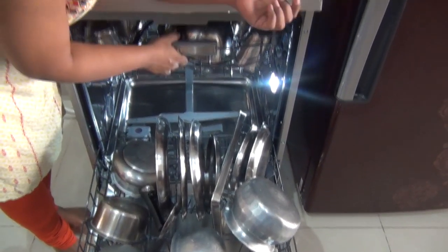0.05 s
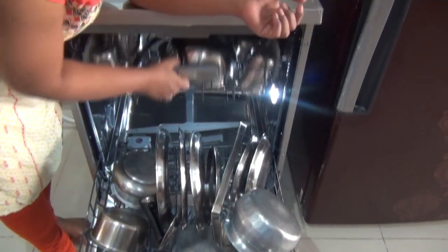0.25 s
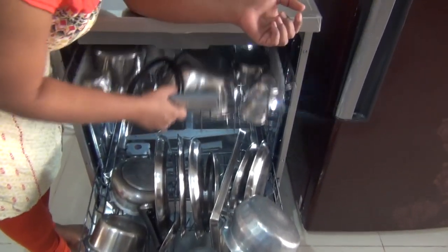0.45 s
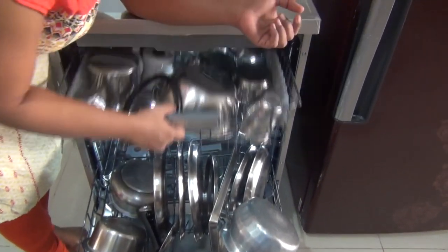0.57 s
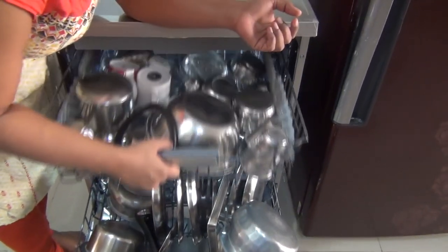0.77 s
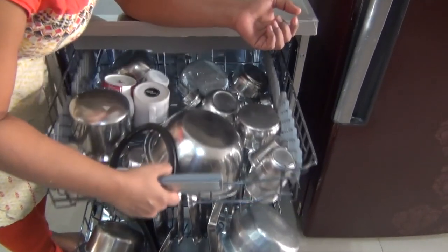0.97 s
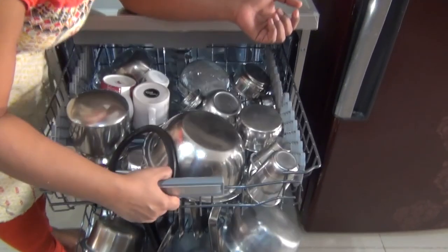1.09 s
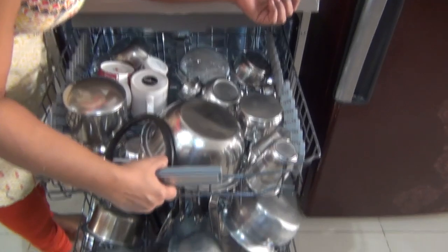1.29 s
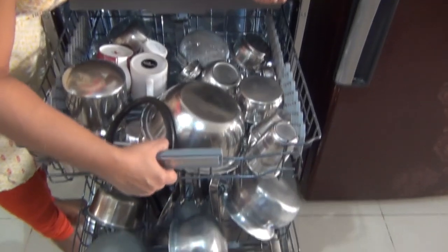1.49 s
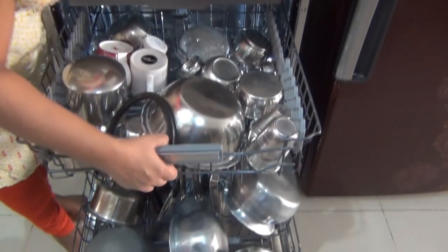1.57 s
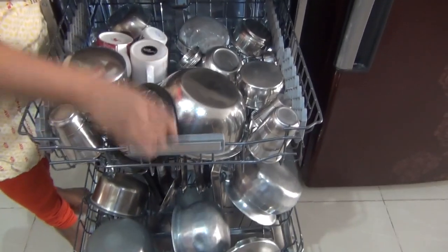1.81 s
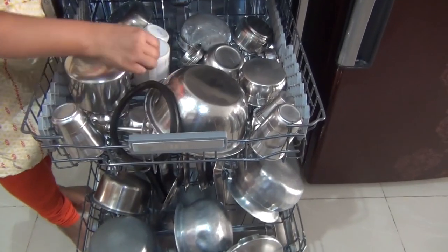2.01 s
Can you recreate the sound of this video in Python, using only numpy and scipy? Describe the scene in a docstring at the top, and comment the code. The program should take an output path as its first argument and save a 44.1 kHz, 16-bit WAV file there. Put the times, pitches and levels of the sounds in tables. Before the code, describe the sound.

A dishwasher rack full of steel pots and cups rolls out with a growing rumble and rattle. The pots clank together, the rack bangs against its stop, and rubbing steel squeaks briefly, heard close by in a quiet kitchen.

```python
"""A dishwasher's upper rack, loaded with steel pots and cups, is pulled out in a quiet kitchen.
Its rolling wheels rumble and the load chatters as it gains speed. The pots crash together, then the
rack hits its end stop; both impacts excite the natural modes of the steel, and the frame shudders.
While the load settles, steel rubs on the rack and friction makes it sing briefly on one note."""
import sys
import numpy as np
from scipy import signal
from scipy.fft import rfft, irfft, next_fast_len
from scipy.io import wavfile
from scipy.ndimage import uniform_filter1d

SR = 44100
rng = np.random.default_rng(int(sys.argv[2]) if len(sys.argv) > 2 else 0)


def store_pcm(level_fs):
    """Save levels as 16-bit WAV."""
    pcm = np.round(np.clip(level_fs, -1, 1) * 32767).astype(np.int16)
    wavfile.write(sys.argv[1], SR, np.atleast_2d(pcm).T)


N = 90404
BURST_SAMPLES = 26460

# Levels along the pull: time_s, rumble_db, chatter_db
PULL_LEVELS = [(0, -77, -64), (.1, -54, -53), (.2, -53.5, -49.5), (.29, -43, -46), (.45, -44, -42),
               (0.521, -34.5, -37.5), (.62, -40, -35), (.71, -36.5, -36.5), (.87, -38, -37.5),
               (0.956, -40, -42.5), (1.04, -44.5, -45.5), (1.12, -46, -48.5), (1.21, -49, -49),
               (1.29, -55, -50.5), (1.42, -66, -63), (1.6, -69, -64), (2.05, -84, -81)]
# Spectra of the wheels and of the ticking load: frequency_hz, relative_db
RUMBLE_SPECTRUM = [(20, -30), (55, -18), (85, -20), (140, -0.5), (200, -4.5), (290, 2), (400, -4),
                   (480, -1.5), (750, -1), (1100, -12), (2500, -35.5), (14000, -63)]
CHATTER_SPECTRUM = [(100, -22), (500, -14.5), (900, -1), (1600, 0), (2200, -3), (4200, -9), (6500, -10.5),
                    (8000, -11), (10000, -8.5), (10900, -13), (12300, -10), (14000, -53)]


def rolling_rack(utensils=5, taps_per_s=420, t60_s=0.027):
    """Forced vibration: wheels rumble in their tracks and shaken utensils tap the wires at random."""
    times, rumble_db, chatter_db = np.transpose(PULL_LEVELS)
    t, ticks, all_taps = since(0), np.zeros((2, N)), np.zeros(N)
    for _ in range(utensils):
        taps = (rng.random(N) < taps_per_s / utensils / SR) * rng.choice([-1, 1], N)
        accent_db = 2 * np.minimum(rng.exponential(1, N), 2.5)
        taps = taps * amp(accent_db)
        direct = unit_rms(stereo_noise() * decay(t[:BURST_SAMPLES], t60_s))
        tick = direct + amp(-6) * unit_rms(room_tail())
        ticks += convolve(taps, colour(tick, CHATTER_SPECTRUM, ripple_db=3.5))
        all_taps += taps
    ring = convolve(all_taps, ringing(PAN_MODES + CUP_MODES))
    chatter = unit_rms(ticks) + amp(-6) * unit_rms(ring)
    rumble = colour(stereo_noise(N), RUMBLE_SPECTRUM)
    return chatter * amp(np.interp(t, times, chatter_db)) + rumble * amp(np.interp(t, times, rumble_db))


# Contacts between the pots: start_s, level_db, hold_s
POT_CONTACTS = [(0.7356, -22.5, 0.0023), (0.7403, -23, 0.0072), (.751, -26.5, 0.0039)]
# Spectrum of each contact: frequency_hz, relative_db
CRASH_SPECTRUM = [(30, -22), (70, -16), (150, -7), (300, -6), (680, -7), (1050, -9), (1470, 3), (1920, -7),
                  (2300, -5), (4100, -8), (7700, -10), (8700, -19), (9900, -11.5), (11600, -15),
                  (12500, -32), (13300, -61)]
# Natural modes of the big pot, the pans and the cups: pitch_hz, relative_db, t60_s
POT_MODES = [(344.5, -33, 1.0), (958, -30, .5), (1196, -36, .4), (1415, -34, .35), (1460, -32, .25),
             (1500, -35, .3), (1689, -39, .45), (1766, -41, .5)]
PAN_MODES = [(300, -42, .5), (459, -35, .6), (577, -44, .8), (616, -39, .5), (798, -40, .5)]
CUP_MODES = [(2186, -47, .5), (2266, -48, .5), (2848, -48, .5), (3607, -49, .5), (3850, -46, .35),
             (4460, -49, .5), (5803, -55, .7), (6406, -53, .6), (6505, -56, .7), (7065, -53, .8),
             (8212, -58, .7), (10239, -57, .5)]
LOAD_MODES = POT_MODES + PAN_MODES + CUP_MODES


def pot_crash():
    """Impact excitation: the pots collide in quick contacts, and the first sets the load ringing."""
    out = np.zeros((2, N))
    for start, db, hold in POT_CONTACTS:
        contact = impact(db, hold, t60_s=0.09, room_db=-8)
        add(out, start, colour(contact, CRASH_SPECTRUM, ripple_db=3))
    add(out, POT_CONTACTS[0][0], amp(-1.5) * ringing(LOAD_MODES))
    return out


# Spectrum of the blow on the end stop: frequency_hz, relative_db
STOP_SPECTRUM = [(30, -47), (70, -23), (125, -4), (300, -2.5), (650, 1), (1150, -6), (1600, 1), (1900, -10),
                 (2450, -4), (3100, -10), (3650, -3.5), (4100, -14), (4480, -2.5), (5100, -12),
                 (6000, -6.5), (6700, -11.5), (7400, -7.5), (9400, -3.5), (10800, -17), (12500, -11.5),
                 (14000, -18)]
# Natural modes of the rail: pitch_hz, level_db, t60_s
RAIL_MODES = [(1630, -32, 0.15), (2503, -39.5, 0.18), (3500, -27.5, 0.04), (3780, -48, 0.29),
              (4479, -28, 0.054), (6010, -37, 0.094), (7100, -41, 0.35), (8460, -55, 0.15),
              (9340, -26.5, 0.066), (12100, -35, 0.058)]


def end_stop(start_s=0.9662):
    """Impulsive force: the sudden halt excites the modes of the rail and, weakly, those of the load."""
    out = np.zeros((2, N))
    blow = impact(db=-22.5, hold_s=0.003, t60_s=0.11, room_db=-9)
    add(out, start_s, colour(blow, STOP_SPECTRUM, ripple_db=3))
    add(out, start_s, amp(-15.5) * ringing(LOAD_MODES) + ringing(RAIL_MODES, rise_s=0.0011))
    return out


# Small knocks in the load: start_s, middle_db, treble_db, hold_s
KNOCKS = [(.127, -47, -60, 0.01), (0.215, -46, -34, 0.006), (0.2267, -54, -35.5, 0.0023),
          (.302, -41.5, -40.5, 0.02), (0.3362, -36.5, -34.5, 0.005), (0.352, -45, -38.5, 0.012),
          (0.377, -52, -43, 0.016), (0.407, -42.5, -38, 0.012), (.474, -42, -38.5, 0.037),
          (.525, -48, -41, 0.0059), (0.545, -38.5, -40, 0.01), (0.613, -39, -61, 0.012),
          (0.6324, -32, -36, 0.013), (0.656, -27.5, -35, 0.0033), (0.725, -28.5, -35.5, 0.0041),
          (.785, -32.5, -43, 0.006), (1.156, -61, -51.5, 0.0048), (1.205, -65, -54, 0.0064),
          (1.49, -57, -64.5, 0.014), (1.635, -65, -65, 0.015), (1.711, -60, -67, 0.017),
          (1.862, -62, -67, 0.0067)]
# Spectra of a knock's middle and treble parts: frequency_hz, relative_db
MIDDLE_SPECTRUM = [(100, -14.5), (500, 1), (900, 3.5), (1600, 5.5), (2200, 4), (3200, -5), (14000, -57)]
TREBLE_SPECTRUM = [(100, -36), (1500, -21), (2600, -6), (4200, 1.5), (5500, -3), (6800, -10), (8100, -3),
                   (10000, -5.5), (10900, -19), (12300, -16), (14000, -22)]
# Natural modes of a spoon: pitch_hz, level_db, t60_s
SPOON_MODES = [(5140, -36.5, 0.092), (6350, -41, 0.11), (8050, -37, 0.14), (9250, -35.5, 0.14),
               (10070, -33, 0.14), (11460, -36, .1)]
# Single modes of cups and spoons: start_s, pitch_hz, level_db, t60_s
UTENSIL_PINGS = [(.305, 2376, -38.5, 0.31), (0.335, 4440, -29, 0.04), (.375, 10500, -33, 0.033),
                 (0.406, 1710, -38, 0.081), (.522, 3950, -39, 0.1), (0.649, 1495, -28, 0.19),
                 (.653, 1770, -29, 0.11), (0.738, 1424, -21, 0.087), (.779, 3840, -28, 0.14),
                 (.786, 10500, -26, 0.028), (1.639, 2500, -52.5, 0.085)]


def clinks(spoon_s=0.633, ping_rise_s=0.0048):
    """Light impacts: shifting utensils knock, while cups and spoons ring in damped free vibration."""
    out, t = np.zeros((2, N)), np.arange(BURST_SAMPLES) / SR
    bands_hz = np.geomspace(100, 14000, 40)
    for start, middle_db, treble_db, hold in KNOCKS:
        middle = middle_db + lookup(MIDDLE_SPECTRUM, bands_hz)
        treble = treble_db + lookup(TREBLE_SPECTRUM, bands_hz)
        spectrum = np.c_[bands_hz, power_sum_db(middle, treble)]
        knock = impact(power_sum_db(middle_db, treble_db), hold, t60_s=0.05, room_db=-13)
        add(out, start, colour(knock, spectrum, ripple_db=2.2))
    add(out, spoon_s, ringing(SPOON_MODES))
    for start, hz, db, t60 in UTENSIL_PINGS:
        envelope = amp(db) * np.minimum(t / ping_rise_s, 1) * decay(t, t60)
        add(out, start, envelope * np.sin(2 * np.pi * hz * t)[None])
    return out


# Swells of the rubbed note: start_s, level_db, rise_s, length_s
RUBS = [(1.302, -38, 0.024, 0.091), (1.334, -39.5, .012, 0.048), (1.391, -39, 0.011, 0.076),
        (1.465, -41.5, 0.015, 0.041), (1.5, -39, 0.0062, 0.055), (1.549, -44.5, 0.012, 0.18)]
# Fainter notes stirred by the rubbing: start_s, pitch_hz, level_db, rise_s, t60_s
FAINT_NOTES = [(1.17, 888, -48.5, 0.033, 1), (1.275, 1090, -58, 0.03, 0.18),
               (1.305, 1310, -51.5, 0.033, 0.34), (1.305, 1523, -51, 0.028, 0.27),
               (1.389, 1312, -54, 0.014, 0.13), (1.422, 1540, -56, 0.04, 0.12)]
# Spectra of the note's rasp and of its opening scrape: frequency_hz, relative_db
RASP_SPECTRUM = [(300, -49), (750, -9), (1000, 12.5), (1200, -20), (1450, -3), (2200, -12), (2800, -7),
                 (4000, -43), (14000, -56)]
SCRAPE_SPECTRUM = [(30, -35), (100, -2), (400, -4), (1000, -1.5), (1900, -8), (2300, -10.5), (2800, -5),
                   (4000, -12.5), (8500, -9), (12500, -18), (14000, -44)]


def singing_steel(pitch_hz=955, flat_hz=42, waver_hz=5, glide_start_s=1.308, scrape_s=1.312):
    """Friction-induced vibration: with a scrape, a note slides up to a pot's mode and swells."""
    waver, grip = slow_noise(), slow_noise()
    hz = pitch_hz - flat_hz * np.exp(-since(glide_start_s) / 0.03) + waver_hz * waver
    envelope = np.zeros(N)
    for start, db, rise, length in RUBS:
        choke = np.clip((length - since(start)) / 0.0064, 0, 1)  # the contact sticks
        envelope += swell(start, db, rise, t60_s=0.36) * choke
    tone = np.sin(2 * np.pi * np.cumsum(hz) / SR)
    rasp = amp(-12) * colour(stereo_noise(N), RASP_SPECTRUM)
    out = envelope * (tone + rasp)
    for start, note_hz, db, rise, t60 in FAINT_NOTES:
        out += np.sin(2 * np.pi * note_hz * since(start)) * swell(start, db, rise, t60)
    out *= 1 + 0.091 * grip
    scrape = impact(db=-45, hold_s=0.03, t60_s=0.079, room_db=-4)
    add(out, scrape_s, colour(scrape, SCRAPE_SPECTRUM, ripple_db=3.5))
    return out


# Shudders of the frame: start_s, centre_hz, level_db, hold_s, t60_s
SHUDDERS = [(.213, 134, -57, 0.11, 0.18), (.29, 85, -50.5, .11, 0.34), (.445, 138, -54.5, 0.069, 0.091),
            (0.547, 530, -31.5, 0.013, 0.064), (.735, 70, -52, 0.03, 0.15), (.968, 139, -41.5, 0.046, 0.65),
            (0.966, 292, -36.5, 0.025, 0.24), (1.032, 252, -42.5, 0.023, 0.49),
            (1.16, 244, -49, 0.041, 0.66)]


def frame_thuds(width_octaves=0.41, rise_s=0.0063):
    """Damped resonance: each jerk makes the loaded wire frame shudder in a broad, low band."""
    out, t = np.zeros((2, N)), np.arange(BURST_SAMPLES) / SR
    for start, centre_hz, db, hold, t60 in SHUDDERS:
        octaves = np.log2((np.fft.rfftfreq(BURST_SAMPLES, 1 / SR) + 1) / centre_hz)
        band = np.exp(-0.5 * (octaves / width_octaves) ** 2)
        phases = np.exp(2j * np.pi * rng.random(len(octaves)))
        shudder = unit_rms(irfft(band * phases, BURST_SAMPLES))
        envelope = amp(db) * np.minimum(t / rise_s, 1) * decay(t - hold, t60)
        add(out, start, envelope * shudder[None])
    return out


# Reverberation time of the kitchen: frequency_hz, t60_s
ROOM_DECAY = [(100, 0.7), (400, 0.66), (1500, 0.55), (4000, 0.68), (9000, 0.51), (14000, 0.25)]


def room_tail(window=256, build_up_s=0.0069):
    """Reverberation: a diffuse field builds up, then dies at the kitchen's rate in each band."""
    hz, t, bands = signal.stft(stereo_noise(), SR, nperseg=window)
    bands = bands * decay(t, lookup(ROOM_DECAY, hz)[:, None])
    _, tail = signal.istft(bands, SR, nperseg=window)
    onset = 1 - np.exp(-np.arange(BURST_SAMPLES) / SR / build_up_s)
    return tail[:, :BURST_SAMPLES] * onset


# Spectra of the kitchen's hiss and of a hollow resonance: frequency_hz, relative_db
AIR_SPECTRUM = [(15, -32), (25, -21), (60, -13), (222, -9.5), (254, -6.5), (429, -14.5), (530, -7.5),
                (1170, -9), (1260, -14.5), (1780, -19), (3010, -23), (12200, -24), (13500, -38)]
HOLLOW_SPECTRUM = [(100, -47), (400, -12), (470, 3), (540, -4.5), (600, -19), (720, -1.5), (900, -12.5),
                   (1100, -31.5), (1900, -24), (2600, -16.5), (3500, -21.5), (6000, -51)]
# Course of the hollow resonance: time_s, level_db
HOLLOW_LEVELS = [(0, -58), (1.2, -78), (1.55, -69), (1.649, -56), (2.05, -61)]


def background(air_db=-55.5):
    """Ambient noise: a steady hiss, with a faint hollow resonance that ebbs and returns."""
    hollow_db = np.interp(since(0), *np.transpose(HOLLOW_LEVELS))
    hollow = amp(hollow_db) * colour(stereo_noise(N), HOLLOW_SPECTRUM)
    return amp(air_db) * colour(stereo_noise(N), AIR_SPECTRUM) + hollow


# Likeness of left and right: frequency_hz, correlation
STEREO_COHERENCE = [(30, 0.49), (80, 0.94), (300, 0.96), (700, 0.86), (1400, 0.82), (2800, 0.76),
                    (6000, 0.72), (12000, 0.56)]


def stereo_noise(size=BURST_SAMPLES):
    """Spatial coherence: white noise, partly alike at two nearby points in a room."""
    padded = next_fast_len(size)
    a, b = rfft(rng.standard_normal((2, padded)))
    coherence = lookup(STEREO_COHERENCE, np.fft.rfftfreq(padded, 1 / SR))
    mid, side = a * np.sqrt((1 + coherence) / 2), b * np.sqrt((1 - coherence) / 2)
    return irfft([mid + side, mid - side], padded)[:, :size]


def impact(db, hold_s, t60_s, room_db):
    """Modal overlap: dense, short-lived metal modes merge into a noise burst with a room tail."""
    t = np.arange(BURST_SAMPLES) / SR
    envelope = np.minimum(t / 0.0006, 1) * decay(t - hold_s, t60_s)
    return amp(db) * (stereo_noise() * envelope + amp(room_db) * room_tail())


def ringing(modes, size=40000, rise_s=0.0021):
    """Modal superposition: struck steel sounds as a sum of damped sinusoids."""
    t, out = np.arange(size) / SR, np.zeros(size)
    for hz, db, t60 in modes:
        out += amp(db) * decay(t, t60) * np.sin(2 * np.pi * (hz * t + rng.random()))
    return out[None] * np.minimum(t / rise_s, 1)


def swell(start_s, db, rise_s, t60_s):
    """Driven resonance: the amplitude builds up under friction, then decays freely."""
    t = since(start_s)
    return amp(db) * np.minimum(t / rise_s, 1) * decay(t - rise_s, t60_s)


def colour(x, spectrum, ripple_db=0, size=4096):
    """Minimum-phase filter of unit energy; random ripple gives the crowded resonances of steel."""
    ripple = unit_rms(uniform_filter1d(rng.standard_normal(size // 2 + 1), 7))
    db = lookup(spectrum, np.fft.rfftfreq(size, 1 / SR)) + ripple_db * np.clip(ripple, -2, 2)
    log_gain = np.log(unit_rms(amp(np.r_[db, db[-2:0:-1]])))
    response = np.exp(np.conj(signal.hilbert(log_gain)))
    return convolve(x, np.fft.ifft(response).real[:size // 2])


def slow_noise(window=300):
    """Two moving averages leave only the slow fluctuations of noise."""
    return unit_rms(uniform_filter1d(uniform_filter1d(rng.standard_normal(N), window), window // 2))


def decay(t, t60):
    """Exponential decay by 60 dB in t60 seconds; 1 for negative t."""
    return np.exp(-np.log(1000) * np.maximum(t, 0) / t60)


def amp(db):
    """Decibels to amplitude ratio."""
    return 10 ** (np.asarray(db) / 20)


def power_sum_db(a_db, b_db):
    """Incoherent sounds add in power."""
    return 10 * np.log10(amp(a_db) ** 2 + amp(b_db) ** 2)


def unit_rms(x):
    """Normalises to an rms of 1."""
    return x / np.sqrt(np.mean(x ** 2) + 1e-20)


def lookup(table, hz):
    """Interpolates on a log-frequency axis."""
    table_hz, values = np.transpose(table)
    return np.interp(np.log(hz + 1), np.log(table_hz + 1), values)


def since(start_s):
    """Seconds since start_s; zero before it."""
    return np.maximum(np.arange(N) / SR - start_s, 0)


def convolve(x, response):
    """Linear filtering, cut to the length of the scene."""
    return signal.fftconvolve(np.atleast_2d(x), np.atleast_2d(response), axes=1)[:, :N]


def add(mix, start_s, sound):
    """Superposes a sound on the mix at start_s."""
    part = mix[:, round(start_s * SR):][:, :sound.shape[1]]
    part += sound[:, :part.shape[1]]


def scene():
    """Superposition: the sounds of the rack and its load add to the kitchen's background."""
    rack = rolling_rack() + pot_crash() + end_stop() + clinks() + singing_steel() + frame_thuds()
    return rack + background()


def record(dry, cutoff_hz=13600):
    """Band limiting: a linear-phase low-pass removes the highest treble."""
    low_pass = signal.firwin(255, cutoff_hz, window=("kaiser", 9), fs=SR)
    return signal.oaconvolve(dry, low_pass[None], "same")


dry = scene()
out = record(dry)
store_pcm(out)
```